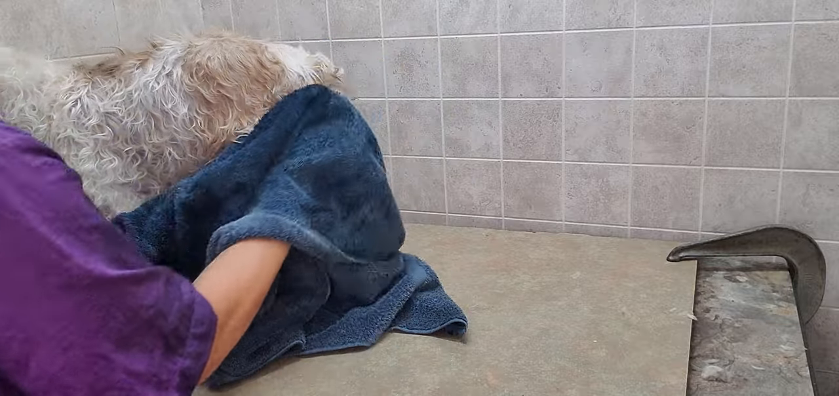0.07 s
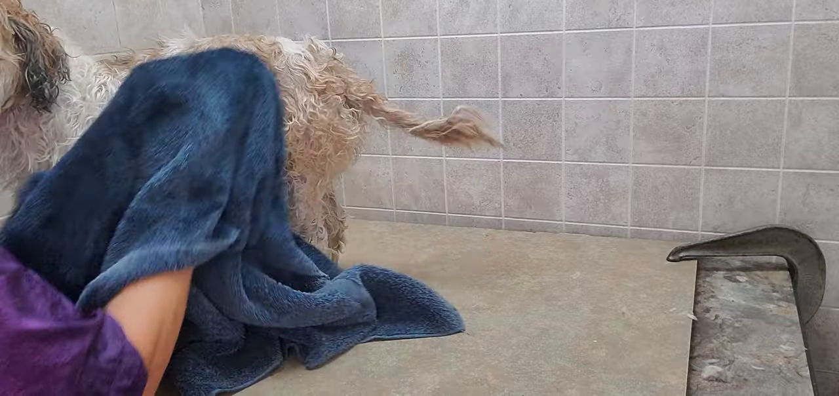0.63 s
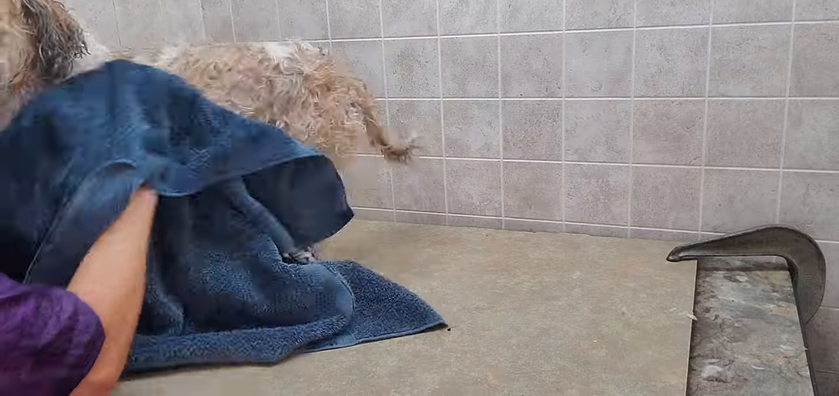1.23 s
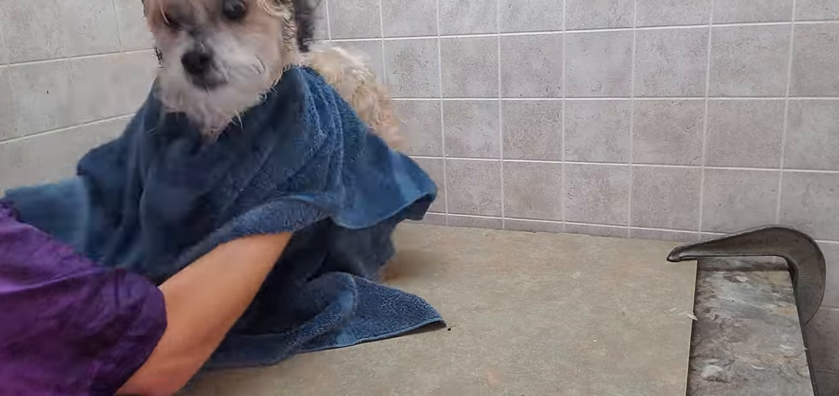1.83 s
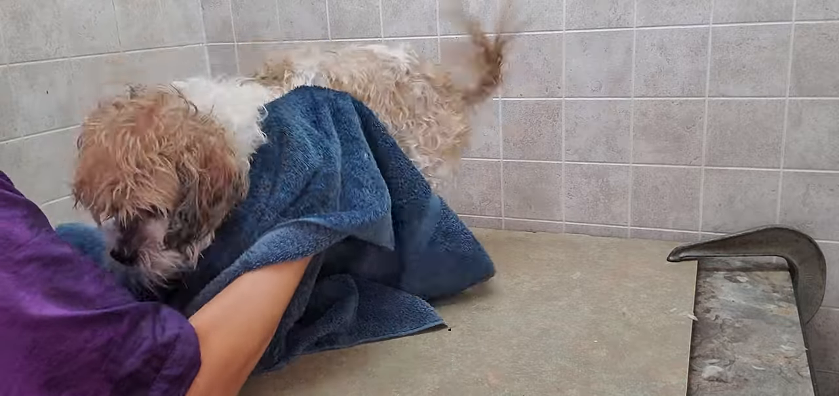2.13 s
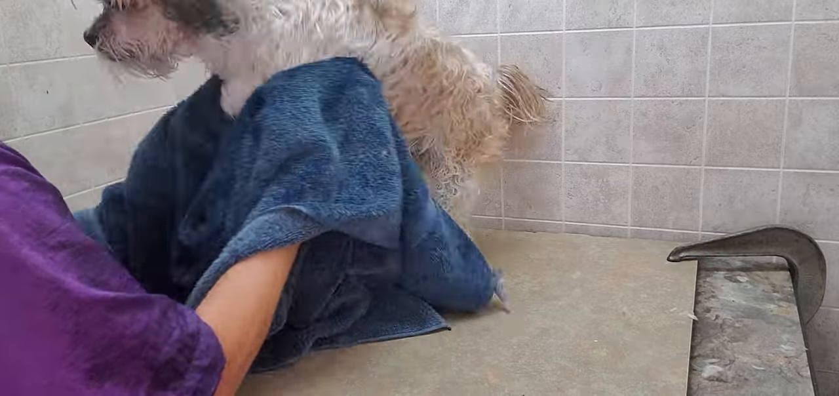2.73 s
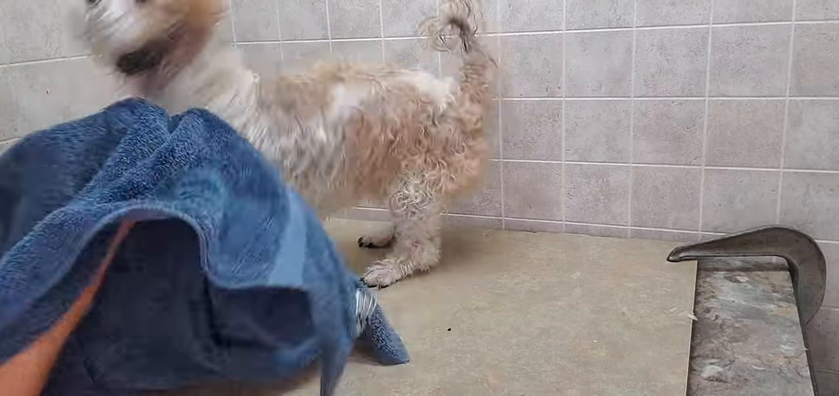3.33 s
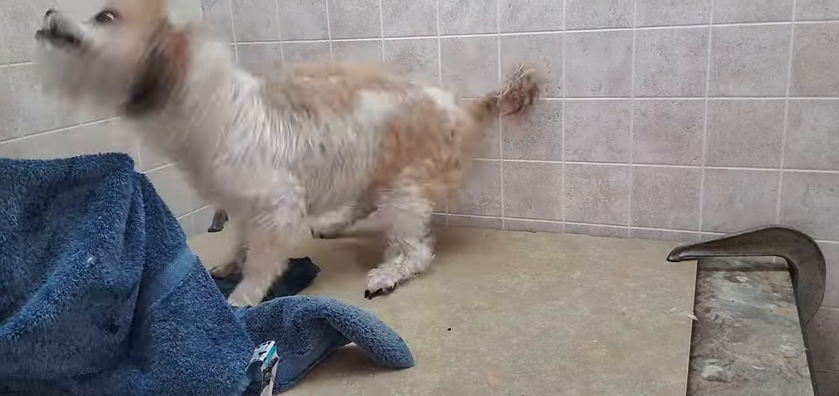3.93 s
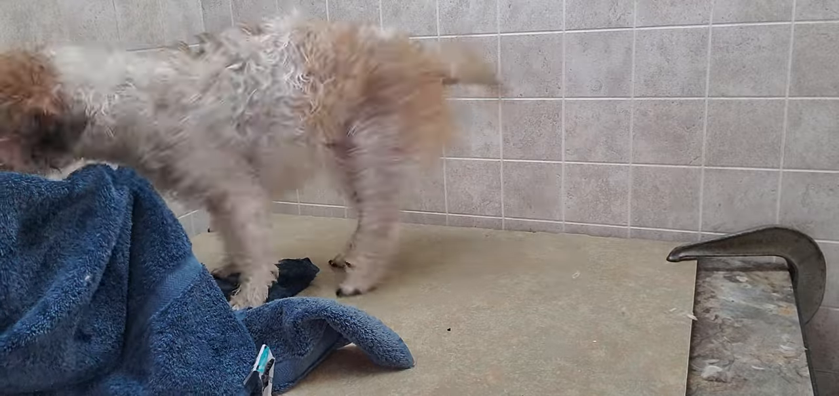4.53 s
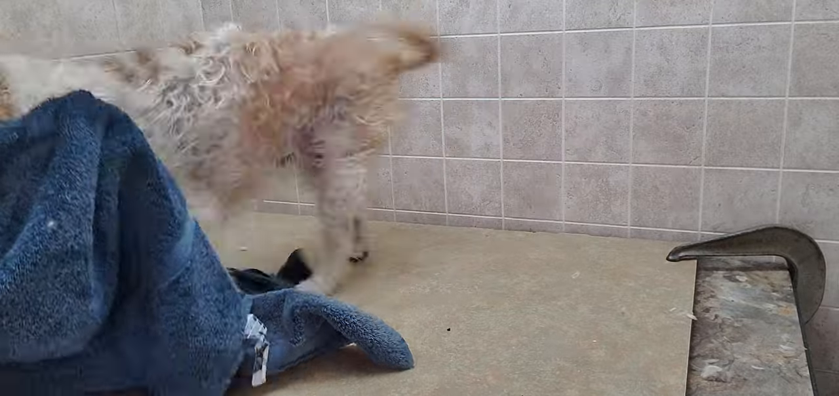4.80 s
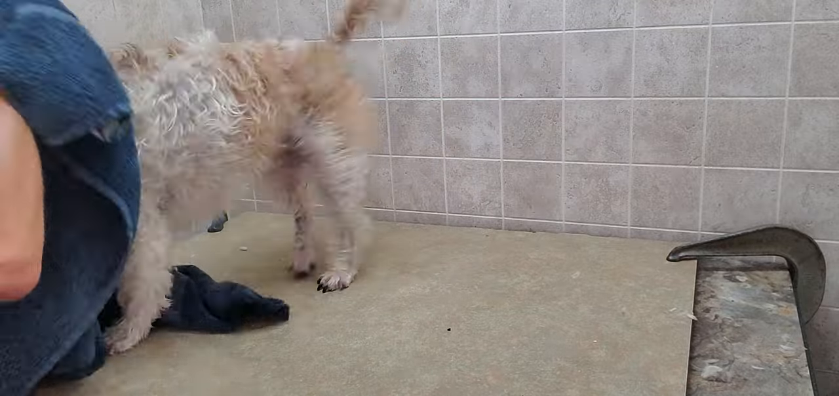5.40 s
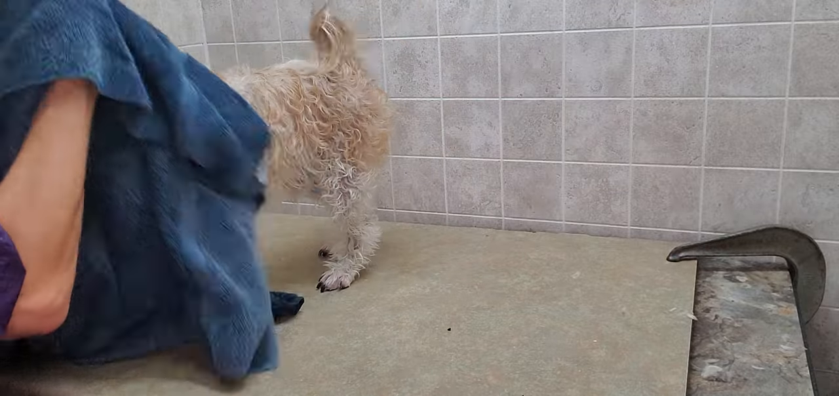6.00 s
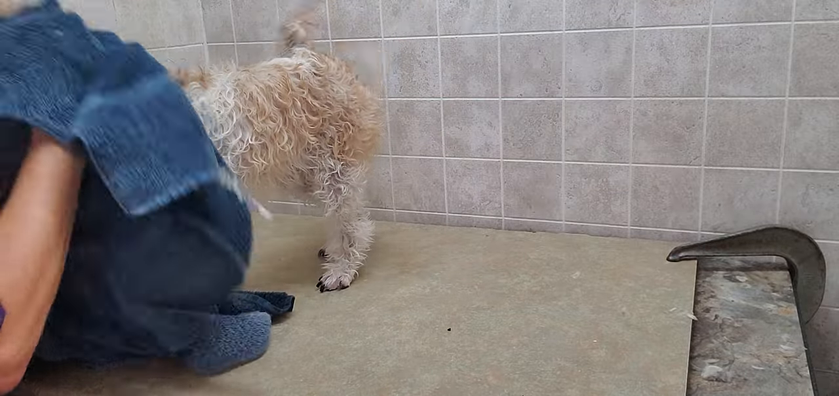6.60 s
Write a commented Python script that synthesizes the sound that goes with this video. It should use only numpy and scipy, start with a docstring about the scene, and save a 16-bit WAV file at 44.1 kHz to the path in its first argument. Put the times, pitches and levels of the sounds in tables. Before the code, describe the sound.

A towel rubs, pats and faintly squeaks on a small wet dog's coat while the hollow tub floor booms under shifting weight. About halfway through, the dog shakes: wet fur whips, claws tap the floor and the ears flap heavily eight times in quick succession. The shake dies away and a few more towel strokes follow. It is heard close up in a tiled grooming tub, over a faint fan hum.

```python
"""A small wet dog in a tiled grooming tub, heard close up over faint fan air and a low hum. First a towel rubs,
pats and squeaks on the coat; the hollow tub floor booms under shifting weight. From 3.4 s the dog shakes: wet
fur whips, claws tap the floor, and the ears flap heavily eight times. The shake runs out through the
hindquarters by 5.7 s, and a few more towel strokes follow."""
import sys
import numpy as np
from scipy import signal
from scipy.fft import rfft, irfft, next_fast_len
from scipy.io import wavfile
from scipy.ndimage import uniform_filter1d

SR = 44100
rng = np.random.default_rng(int(sys.argv[2]) if len(sys.argv) > 2 else 0)


def generate_wav(sig):
    """Save sig (samples, or channels by samples) to the path in sys.argv[1] as 16-bit PCM at SR."""
    pcm = np.round(np.clip(np.atleast_2d(sig).T, -1, 1) * 32767).astype(np.int16)
    wavfile.write(sys.argv[1], SR, pcm)


N = 293353
HIT_N = SR // 2
TIME_S, HIT_S = np.arange(N) / SR, np.arange(HIT_N) / SR


def undb(db):
    """Decibels to gain."""
    return 10 ** (np.asarray(db) / 20)


def unit(x):
    """Scale to rms 1."""
    return x / np.sqrt(np.mean(x ** 2))


def crest(x, size=256):
    """Scale the loudest window of `size` samples to rms 1."""
    power = uniform_filter1d(np.atleast_2d(x) ** 2, size).mean(axis=0)
    return x / np.sqrt(power.max())


def curve(points):
    """Straight lines through (seconds, value) points."""
    return np.interp(TIME_S, *np.transpose(points))


def pan(db):
    """Stereo gains for a pan in dB, left minus right."""
    gains = undb(np.array([np.atleast_1d(db), -np.atleast_1d(db)]) / 2)
    return gains / np.sqrt(np.mean(gains ** 2, axis=0))


def add(track, start_s, sound):
    """Mix a sound into a track."""
    start = max(int(start_s * SR), 0)
    track[:, start:start + sound.shape[-1]] += sound[..., :N - start]


def colour(x, points):
    """Minimum-phase filter through (Hz, dB) points."""
    n = x.shape[-1]
    size = 2 * next_fast_len(n // 2 + 2048)
    hz, db = np.transpose(points)
    bins_hz = np.arange(size // 2 + 1) * SR / size
    gain = undb(np.interp(np.log(bins_hz + 1), np.log(hz), db))
    cepstrum = irfft(np.log(gain))[:size // 2]
    cepstrum[1:] *= 2
    return irfft(rfft(x, size) * np.exp(rfft(cepstrum, size)))[..., :n]


def resonate(x, hz, width_hz):
    """One resonance, gain 1 at its centre."""
    return signal.lfilter(*signal.iirpeak(hz, hz / width_hz, fs=SR), x)


def modes(force, table):
    """Several resonances driven by one force."""
    return sum(undb(db) * resonate(force, hz, width_hz) for hz, width_hz, db in table)


def walk(rate_hz):
    """Smooth random drift, rms 1."""
    hold = int(SR / rate_hz)
    stairs = np.repeat(rng.standard_normal(N // hold + 1), hold)
    return unit(uniform_filter1d(uniform_filter1d(stairs, hold), hold)[:N])


def fibres(n, grain_db, apart_hz=650):
    """Stereo noise of tiny uneven clicks; long waves reach both sides alike."""
    mid, side = rng.standard_normal((2, n)) * undb(grain_db * np.minimum(rng.exponential(size=n), 6))
    side = signal.sosfilt(signal.butter(1, apart_hz, "high", fs=SR, output="sos"), side)
    return unit(np.array([mid + 1.025 * side, mid - 1.01 * side]))


def contact(length_s, rise_s, release_s):
    """Envelope of a soft contact: sets in, holds, lets go."""
    return (1 - np.exp(-HIT_S / rise_s)) * np.exp(-np.maximum(HIT_S - length_s, 0) / release_s)


def push(start_s, length_s, rise_s, release_s):
    """Envelope of a movement in the scene: builds, holds, dies away."""
    age_s = TIME_S - start_s
    build = np.sin(np.pi / 2 * np.clip(age_s / rise_s, 0, 1)) ** 2
    return build * np.exp(-np.clip((age_s - length_s) / release_s, 0, 20))


def tiles(x, t60_s=0.31):
    """Dense reflections off tiled walls, different on each side."""
    tail = fibres(HIT_N, 0) * undb(-60 * HIT_S / t60_s) * (1 - np.exp(-HIT_S / 0.003))
    tail = signal.sosfilt(signal.butter(2, 170, "high", fs=SR, output="sos"), tail)
    return signal.fftconvolve(x, tail / np.sqrt(np.sum(tail ** 2) / 2), axes=1)[:, :N]


# Fan air spectrum. Each row: frequency in Hz, gain in dB.
AIR_SPECTRUM = [(25, -8.5), (70, 4.5), (110, -17), (200, -11), (310, -7.5), (470, -26.5), (680, -20.5),
                (850, -11.5), (1080, -29), (1500, -35), (2150, -25.5), (2700, -33.5), (3600, -29),
                (7500, -43), (9500, -35), (15500, -30)]
# Low hum, mostly at the tub's resonances. Each row: frequency in Hz, level in dB.
HUM_TONES = [(70, -69), (150, -65.5), (220, -73.5), (274, -72.5), (339, -75.5)]


def background():
    """Steady fan air with a faint wavering low hum."""
    air = unit(colour(fibres(N, 0), AIR_SPECTRUM)) * undb(-59 + walk(1.9))
    hum = sum(undb(db + 0.83 * walk(1.5)) * np.sqrt(2) * np.sin(2 * np.pi * hz * TIME_S)
              for hz, db in HUM_TONES)
    return (air + hum) * pan(3.5)


# Cloth squeaks. Each row: start in seconds, pitch in Hz, width in Hz, level in dB, length in seconds.
CLOTH_SQUEAKS = [(1.866, 8100, 700, -59.5, 0.11), (1.893, 13800, 1300, -54, 0.074),
                 (2.002, 8800, 450, -57, 0.15), (2.024, 13900, 1400, -52, .11),
                 (2.175, 3600, 400, -52, 0.061), (2.178, 9500, 240, -61, .073),
                 (2.738, 3700, 500, -56.5, 0.076), (6.239, 8900, 710, -56.5, 0.12),
                 (6.287, 3140, 1100, -41.5, .17)]


def squeaks():
    """Damp fibres stick and slip fast enough to give thin, airy whistles."""
    out = np.zeros((2, N))
    for start_s, hz, width_hz, db, length_s in CLOTH_SQUEAKS:
        stage_width_hz = 1.5 * width_hz  # two stages narrow the band again
        band = resonate(fibres(HIT_N, 0), hz, stage_width_hz)
        whistle = unit(resonate(band, hz, stage_width_hz))
        swell = np.sin(np.pi * np.minimum(HIT_S / length_s, 1))
        add(out, start_s, undb(db) * whistle * swell * pan(2.3))
    return out + undb(-1.5) * tiles(out)


# Pressed cloth spectrum. Each row: frequency in Hz, gain in dB.
PRESS_SPECTRUM = [(40, -21.5), (100, -4.5), (150, 2), (280, -2), (420, -5.5), (750, -15.5), (1200, -22.5),
                  (2500, -32), (8000, -55.5)]
# Towel pats. Each row: start in seconds, puff in dB, scuff in dB.
TOWEL_PATS = [(0.134, -68, -91), (0.28, -63, -64), (0.748, -53, -59), (1.111, -49, -77), (1.223, -53, -72),
              (1.596, -47, -61), (1.739, -43.5, -56), (1.803, -33, -48), (2.019, -40, -50.5),
              (2.132, -41.5, -39), (2.335, -41, -37), (2.356, -36.5, -56), (2.523, -47, -51.5),
              (2.622, -52, -48), (2.714, -43, -54), (2.873, -46, -55), (3.076, -36.5, -53),
              (3.104, -41, -34.5), (3.562, -63, -39.5), (3.639, -49, -43), (5.3, -34, -60),
              (5.832, -52.5, -54), (6.204, -55, -71), (6.4, -49, -50), (6.582, -47.5, -58)]
PAT_HOLD_S = 0.022


def pats():
    """The folded towel lands with a muffled puff and scuffs along the coat."""
    out = np.zeros((2, N))
    press = contact(PAT_HOLD_S, rise_s=0.003, release_s=0.017)
    scuff_spectrum = [(250, -17.5), (550, 1.5), (800, -6.5), (1200, -11.5), (2400, -15.5), (5000, -45)]
    for start_s, puff_db, scuff_db in TOWEL_PATS:
        puff = colour(fibres(HIT_N, 3.4) * press, PRESS_SPECTRUM)
        scuff = colour(fibres(HIT_N, 4.8) * press, scuff_spectrum)
        add(out, start_s, undb(puff_db) * crest(puff, size=800) * pan(2.1))
        add(out, start_s, undb(scuff_db) * crest(scuff, size=800) * pan(3.6))
    return out + undb(-3) * tiles(out)


# Weight landing on the floor. Each row: start in seconds, length in seconds, boom in dB.
FLOOR_STEPS = [(0.0, 0.02, -48.5), (0.13, .06, -53), (0.26, .04, -54), (0.63, 0.043, -53),
               (0.71, 0.039, -50), (1.03, 0.032, -54), (1.11, 0.042, -49), (1.36, 0.11, -45),
               (2.12, 0.061, -32.5), (2.26, .05, -41), (2.33, 0.034, -39.5), (2.54, 0.077, -38),
               (2.72, 0.3, -42.5), (3.22, 0.082, -24), (3.41, 0.032, -35), (3.54, 0.086, -31.5),
               (3.76, 0.075, -25.5), (4.81, 0.047, -33), (4.92, 0.058, -23.5), (5.01, 0.052, -26.5),
               (5.16, 0.047, -32), (5.29, 0.071, -29), (5.51, 0.088, -31), (5.96, 0.053, -50)]
# Tub floor modes. Each row: frequency in Hz, width in Hz, relative level in dB.
FLOOR_MODES = [(70.4, 5.94, 1), (148.9, 10, -12), (224.7, 16, -18)]


def tub(press, vigour, press_db=-2.5, shake_db=-33, pat_db=-5):
    """Hands, steps and the shake ring the hollow floor; wider modes wander more in pitch and level."""
    power = (undb(press_db) * press) ** 2 + (undb(shake_db) * vigour) ** 2
    pat_loads = [(start_s, 2 * PAT_HOLD_S, puff_db + pat_db) for start_s, puff_db, _ in TOWEL_PATS]
    for start_s, length_s, db in FLOOR_STEPS + pat_loads:
        power += (undb(db) * push(start_s, length_s, rise_s=0.43 * length_s, release_s=0.036)) ** 2
    boom = 0
    for hz, width_hz, db in FLOOR_MODES:
        phase = 2 * np.pi * np.cumsum(hz + 0.7 * width_hz * walk(22)) / SR
        boom += undb(db + 0.1 * width_hz * walk(14)) * np.sin(phase)
    return unit(boom) * np.sqrt(power) * pan(0.94)


# Towel strokes. Each row: start in seconds, length in seconds, rub in dB, rasp in dB, hiss in dB.
TOWEL_STROKES = [(0.0, 0.012, -56.5, -66, -62), (0.111, 0.086, -62.5, -79, -64),
                 (0.258, 0.23, -77, -63.5, -60.5), (0.604, 0.3, -62.5, -65, -63),
                 (1.07, 0.21, -60, -62.5, -60), (1.324, .13, -53.5, -65, -63),
                 (1.486, 0.16, -56.5, -64.5, -59), (1.697, 0.16, -42, -48, -47),
                 (1.882, 0.12, -47, -56, -53), (2.04, .08, -43.5, -53, -53),
                 (2.092, 0.13, -38, -54.5, -54.5), (2.314, 0.05, -38, -53, -45),
                 (2.552, 0.16, -51, -61, -57.5), (2.722, .08, -48, -58.5, -51),
                 (2.882, 0.19, -53.5, -56.5, -54), (3.073, 0.14, -36, -51.5, -57.5),
                 (3.211, .07, -43.5, -44, -49.5), (3.303, 0.13, -59, -54.5, -44.5),
                 (5.535, 0.11, -42.5, -64, -51.5), (5.743, 0.15, -58, -61, -78),
                 (5.926, 0.086, -50, -56.5, -71), (6.044, .07, -55, -54.5, -82),
                 (6.256, 0.22, -62, -46, -37.5), (6.44, 0.079, -46.5, -47, -53),
                 (6.56, .09, -57, -54.5, -52.5)]


def towel_strokes(rest_rasp_db=-70, rest_hiss_db=-65.5, hiss_end_s=5.2, release_s=0.042):
    """Rub, rasp and hiss gains; a faint background rasp and hiss lie under the strokes and stop at hiss_end_s."""
    resting = push(-1, 1 + hiss_end_s, 1, release_s)
    power = np.outer([0, undb(rest_rasp_db), undb(rest_hiss_db)], resting) ** 2
    for start_s, length_s, *levels_db in TOWEL_STROKES:
        stroke = push(start_s, length_s, 0.34 * length_s, release_s)
        power += np.outer(undb(levels_db), stroke) ** 2
    return np.sqrt(power)


# Body shake. Each row: time in seconds, vigour in dB.
SHAKE_VIGOUR = [(3.3, -42), (3.42, -8), (3.54, -1.5), (3.76, -1.5), (4.05, 0), (4.65, -3), (4.9, -2),
                (5.3, -2), (5.58, -12.5), (5.75, -27)]


def shake():
    """Gain of the shake: builds, peaks with the head, runs out through the hindquarters."""
    return undb(curve(SHAKE_VIGOUR))


# Towel position. Each row: time in seconds, pan in dB.
TOWEL_PAN = [(0, 4.5), (1.6, 6), (1.85, 2.5), (2.6, 5), (3.4, 3.5), (6.6, 3)]
# Sliding cloth spectrum. Each row: frequency in Hz, gain in dB.
RASP_SPECTRUM = [(200, -17.5), (600, 0.5), (1000, 2.5), (1500, -2), (2300, 2), (3800, -1), (4800, -11.5),
                 (6000, -16.5), (7500, -19.5), (12000, -36)]
# Brushed fibre spectrum. Each row: frequency in Hz, gain in dB.
HISS_SPECTRUM = [(2000, -18.5), (5000, -3.5), (7500, -9), (9200, -1), (10500, -2.5), (12500, 1),
                 (15500, 1.5)]


def towel_and_coat(strokes, vigour, coat_rub_db=-37, coat_rasp_db=-42.5, coat_hiss_db=-39.5):
    """Cloth and shaken coat catch and slip: pressure gives a dull rub, sliding a rasp and a hiss."""
    coat = np.outer(undb([coat_rub_db, coat_rasp_db, coat_hiss_db]), vigour)
    press, slide, brush = np.hypot(strokes, coat)
    slip = walk(45)
    rub = unit(colour(fibres(N, 2.56), PRESS_SPECTRUM)) * press * undb(2.85 * slip)
    rasp = unit(colour(fibres(N, 2.8), RASP_SPECTRUM)) * slide * undb(1.1 * slip)
    hiss = unit(colour(fibres(N, 1.4), HISS_SPECTRUM)) * brush * coat_turns()
    hiss *= undb(1.3 * slip + 0.73 * walk(130))
    return rub * pan(1.4) + (rasp + hiss) * pan(curve(TOWEL_PAN))


# Claw tap spectrum. Each row: frequency in Hz, gain in dB.
TAP_SPECTRUM = [(150, -20.5), (500, -7.5), (950, -9.5), (1400, -5.5), (2000, -2), (2600, 0), (3200, -3.5),
                (3900, -4.5), (4800, -13.5), (6200, -17), (7500, -26.5), (10000, -25.5), (16000, -25)]
# Claw taps. Each row: start in seconds, level in dB, pan in dB, ring in Hz, treble gain in dB.
CLAW_TAPS = [(1.72, -42.5, 26, 2470, -14), (1.791, -36, 11, 2040, -7), (2.519, -43, 14, 1790, -6),
             (3.107, -39.5, 1, 2170, -17), (3.225, -30.5, 5, 2560, -7), (3.258, -36.5, 3.5, 2380, 0),
             (3.422, -38.5, 5, 1910, -1.5), (3.4962, -24, 4, 2190, 2), (3.644, -29, 12, 2110, 5),
             (3.718, -33.5, -6, 2160, 3), (3.761, -19, 3, 2295, 5.5), (3.867, -37.5, -3, 2240, -7),
             (3.944, -34, -2, 2020, 5), (4.05, -26.5, 2, 1840, 6), (4.293, -34, 8, 1930, -23),
             (4.417, -44, 18, 2280, -1.5), (4.546, -33.5, 8, 2470, -10), (4.7897, -24, 12, 3250, 5.5),
             (4.905, -33, 1, 2740, -5), (4.983, -19.5, 8, 2296, 0), (5.111, -22.5, 3, 2250, 1),
             (5.288, -19, 4.5, 2655, 8.5), (5.471, -25, 4, 2230, 3), (5.561, -37, 7, 2490, -6),
             (5.937, -45.5, 5, 2480, -21)]


def claws():
    """A paw's claws hit the floor within milliseconds and ring briefly; the tiles ring on."""
    direct, to_walls = np.zeros((2, 2, N))
    for start_s, db, pan_db, ring_hz, treble_db in CLAW_TAPS:
        clicks = fibres(HIT_N, 3.17, apart_hz=2220) * contact(0.0037, 0.00049, 0.0033)
        clicks = colour(clicks, TAP_SPECTRUM)
        clicks = crest(colour(clicks, [(3000, 0), (6500, treble_db)]))
        phase = 2 * np.pi * ring_hz * HIT_S
        overtone = 0.18 * np.sin(phase * rng.uniform(1.4, 1.5))
        ring = (np.sin(phase) + overtone) * contact(0.001, 0.00011, 0.0027)
        tap = undb(db) * crest(clicks + undb(2) * ring)
        add(direct, start_s, tap * pan(pan_db))
        add(to_walls, start_s, tap * pan(2))
    return direct + undb(1.44) * tiles(to_walls)


# Wet strand spectrum. Each row: frequency in Hz, gain in dB.
STRAND_SPECTRUM = [(300, -38.5), (1200, -4.5), (2500, -8), (4000, -9), (5500, -14), (7500, -17), (9500, -7),
                   (12000, -6), (15500, -1)]
# Fur flicks. Each row: start in seconds, level in dB, pan in dB.
FUR_FLICKS = [(1.345, -49, 7), (1.784, -41.5, 3), (2.33, -42.5, 4.5), (3.402, -42.5, 3), (3.4223, -33, 2),
              (3.494, -27, 0), (3.568, -28.5, 4), (3.645, -20, 1.5), (3.719, -27, 4), (3.761, -31, 1),
              (3.795, -24, 3), (3.868, -29.5, 3), (3.944, -26.5, 2.5), (4.012, -27.5, 3.5),
              (4.088, -21.5, 3.5), (4.159, -34, 5), (4.234, -30.5, 1), (4.257, -29.5, 7), (4.363, -27, 5),
              (4.413, -30, 2), (4.492, -30.5, 6), (4.546, -22.5, 3), (4.677, -20.5, 2.5), (4.709, -30.5, 1),
              (5.289, -28.5, 4), (5.449, -34.5, 2)]


def fur(snap_db=-4.5):
    """Wet strands whip round at each turn of the coat: a sharp snap, then a fine spray."""
    out = np.zeros((2, N))
    snap, spray = contact(0.00084, 0.00035, 0.0012), contact(0.0034, 0.0014, 0.011)
    for start_s, db, pan_db in FUR_FLICKS:
        strands = colour(fibres(HIT_N, 3.85), STRAND_SPECTRUM)
        flick = undb(snap_db) * crest(strands * snap) + crest(strands * spray)
        add(out, start_s, undb(db) * flick * pan(pan_db))
    return out + undb(-0.2) * tiles(out)


def coat_turns(dip_db=-1.5, turn_s=0.015):
    """Hiss gain: dips as the coat slows just before each flick."""
    slowing = sum(np.exp(-((TIME_S - start_s + turn_s) / turn_s) ** 2) for start_s, _, _ in FUR_FLICKS)
    return undb(dip_db * slowing)


# Tub hollow resonances. Each row: frequency in Hz, width in Hz, gain in dB.
HOLLOW_MODES = [(152.4, 14, 2), (193.4, 28.5, 3), (248.8, 6.9, 8.5), (304, 24, -1)]


def ear_flutter(length_s):
    """An ear beats against the head, hardest at first, and excites the tub's hollow."""
    beats = fibres(HIT_N, 2.1, apart_hz=1000) * contact(0.97 * length_s, 0.00037, 0.014)
    beats *= 1 + 1.65 * np.exp(-HIT_S / 0.016)
    spectrum = [(50, -20), (115, 1), (155, 7), (380, -1), (1200, -15.5), (5000, -25.5)]
    flutter = colour(modes(beats, HOLLOW_MODES), spectrum)
    return crest(flutter * contact(length_s, 0.0004, 0.052), size=700)


# Ear and skull resonances. Each row: frequency in Hz, width in Hz, gain in dB.
SKULL_MODES = [(404, 48, -3), (488, 32, 1), (547, 23, 4.5), (648, 100, -1), (750, 9.8, -4), (870, 42, -4),
               (1080, 69, -29), (1930, 1100, -17)]
# Smack spectrum. Each row: frequency in Hz, gain in dB.
SMACK_SPECTRUM = [(200, -10.5), (400, 3), (1200, -0.5), (3000, -11), (8000, -38)]


def ear_smack():
    """An ear lands; the impact rings ear and skull."""
    impact = fibres(HIT_N, 2) * contact(0.005, 0.00028, 0.014)
    return crest(colour(modes(impact, SKULL_MODES), SMACK_SPECTRUM), size=800)


# Ear flaps. Each row: start in seconds, flutter in dB, thump in dB, smack in dB,
# hollow note in Hz, hollow note in dB, nominal length in seconds.
EAR_FLAPS = [(3.732, -16, -18.5, -26, 213, -29, 0.047), (3.861, -17, -12, -30, 294, -17.5, 0.037),
             (4.0, -19.5, -14, -35.5, 260.7, -14, 0.042), (4.149, -19, -12.5, -40, 259.6, -16.5, 0.035),
             (4.283, -16.5, -11.5, -21, 263, -11, 0.036), (4.415, -19.5, -12, -19, 260, -13, 0.039),
             (4.545, -14.5, -9, -21, 257.3, -14, 0.047), (4.676, -21.5, -18.5, -27, 209.7, -15.5, 0.052)]


def ears(thump_hz=80, head_hz=190, head_db=-3, sag_per_s=0.7):
    """Each swing jolts the floor; the ears flutter and smack, ringing the hollow and the head."""
    jolts, flaps = np.zeros((2, 2, N))
    sagging_s = HIT_S * (1 - sag_per_s * HIT_S / 2)  # pitch falls as the ear slows
    driven, lingering = contact(0.013, 0.004, 0.01), 0.32 * contact(0.011, 0.0043, 0.048)
    head = contact(0.018, 0.004, 0.02) * np.sin(2 * np.pi * head_hz * sagging_s)
    for start_s, flutter_db, thump_db, smack_db, note_hz, note_db, length_s in EAR_FLAPS:
        # fast swell, damped by the dog's weight
        swell = np.sin(np.pi * np.minimum(HIT_S / (1.5 * length_s), 1) ** 0.77)
        detune = 1 + 0.02 * rng.standard_normal()
        thump = swell * np.sin(2 * np.pi * thump_hz * detune * HIT_S)
        note = (driven + lingering) * np.sin(2 * np.pi * note_hz * sagging_s)
        add(jolts, start_s, undb(thump_db) * thump * pan(1))
        add(flaps, start_s, undb(flutter_db) * ear_flutter(length_s) * pan(1.4))
        add(flaps, start_s, (undb(note_db) * note + undb(flutter_db + head_db) * head) * pan(3.4))
        add(flaps, start_s, undb(smack_db) * ear_smack() * pan(3.1))
    return jolts + flaps + undb(-2.5) * tiles(flaps)


def scene():
    """Towel, tub, dog and fan together."""
    strokes, vigour = towel_strokes(), shake()
    rubbing = towel_and_coat(strokes, vigour) + squeaks()
    boom = tub(press=strokes[0], vigour=vigour)
    return rubbing + boom + ears() + pats() + claws() + fur() + background()


# Microphone treble balance. Each row: frequency in Hz, left minus right in dB.
TREBLE_BALANCE = [(1000, -0.5), (2200, 0.5), (4200, 0.5), (6000, 2.5), (8500, -2.5), (10500, -3),
                  (12500, -3), (15500, 6.5)]
TOP_HZ = 15750


def record(dry):
    """Each microphone colours the treble its own way; a steep low-pass cuts the top."""
    heard = [colour(channel, [(hz, side * db / 2) for hz, db in TREBLE_BALANCE])
             for channel, side in zip(dry, (1, -1))]
    return signal.sosfilt(signal.ellip(10, 0.2, 70, TOP_HZ, fs=SR, output="sos"), heard)


dry = scene()
out = record(dry)
generate_wav(out)
```